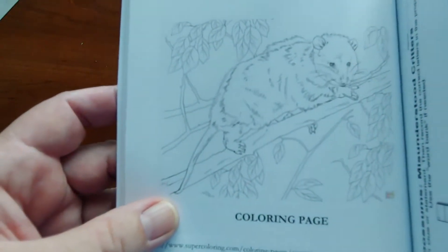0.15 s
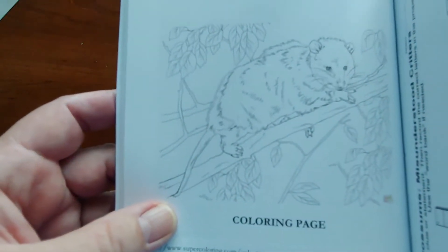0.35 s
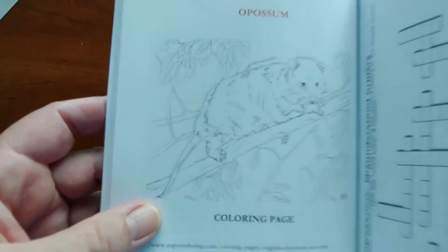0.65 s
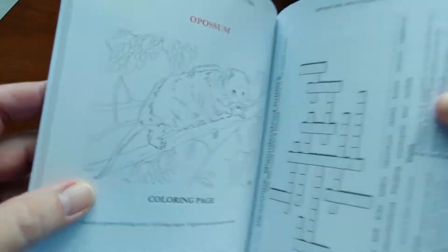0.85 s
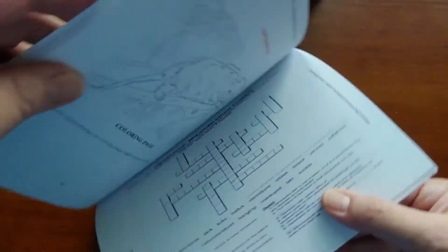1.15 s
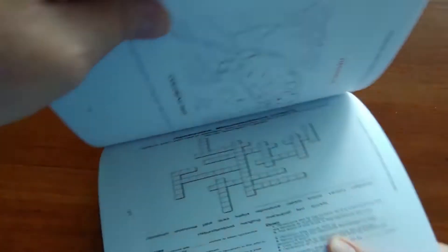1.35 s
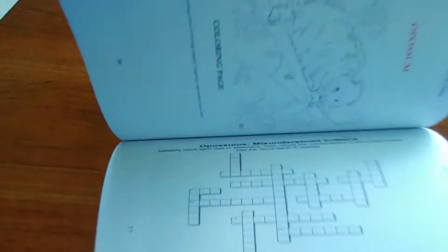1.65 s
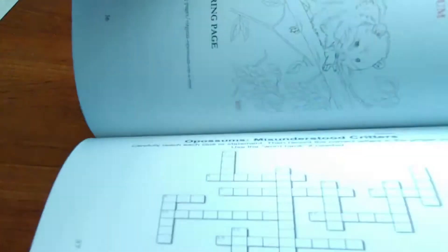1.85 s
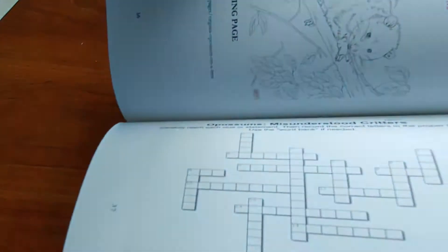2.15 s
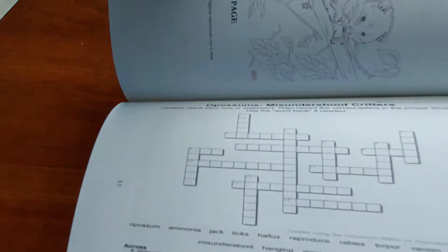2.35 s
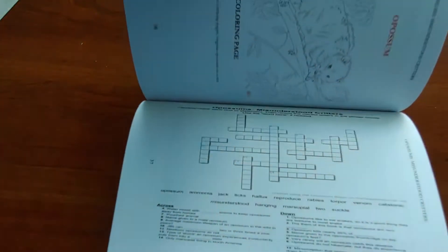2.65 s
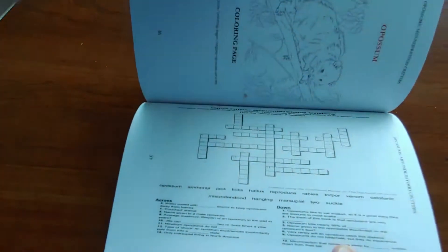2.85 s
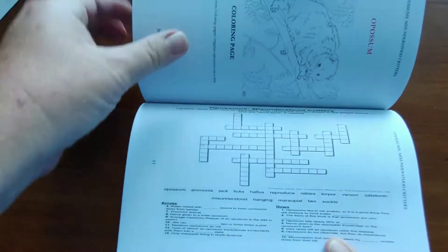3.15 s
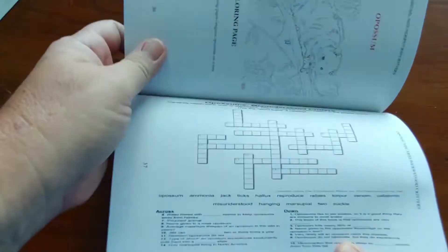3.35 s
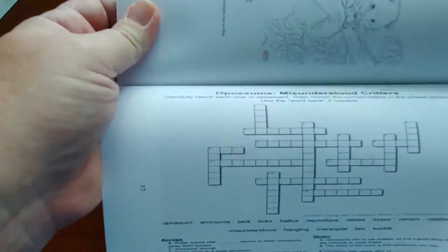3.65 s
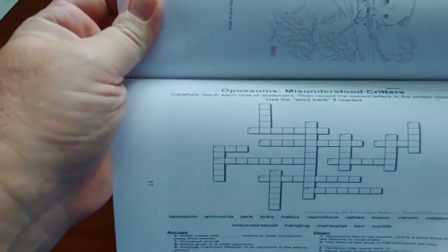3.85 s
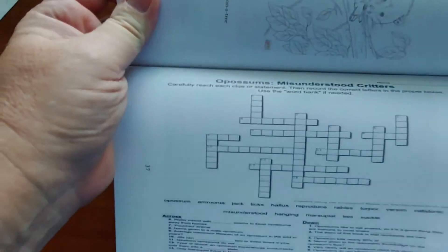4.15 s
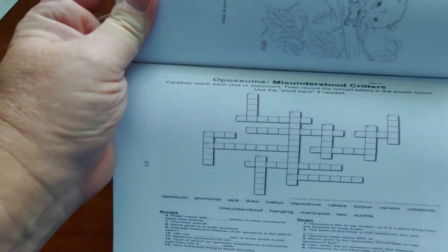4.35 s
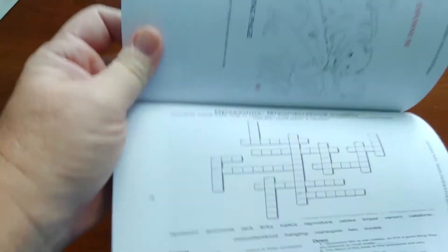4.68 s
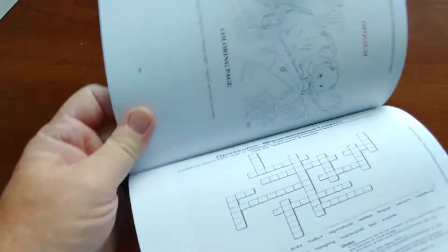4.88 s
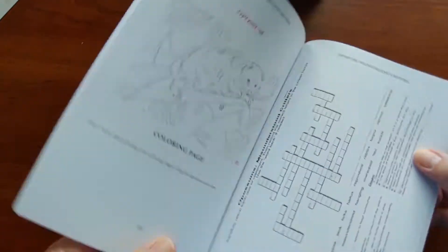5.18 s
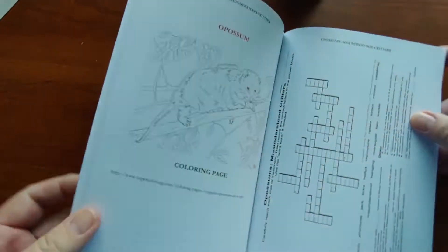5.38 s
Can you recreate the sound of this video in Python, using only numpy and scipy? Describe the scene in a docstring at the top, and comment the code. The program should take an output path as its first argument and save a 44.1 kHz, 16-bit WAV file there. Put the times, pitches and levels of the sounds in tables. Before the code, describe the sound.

A paperback is handled over a wooden desk, close to a pair of microphones, in a small, quiet room with a faint low hum. From about 0.8 seconds the book opens: sheets slide with a soft, grainy hiss, with a few small ticks and a brief rising scrape of a page edge around 1.2 seconds. Faint sliding and finger brushes on the paper follow until about 2.5 seconds. At 2.8 seconds a sheet buckles with a loud, hollow snap, briefly answered by the room, and pages rustle in short bursts until about 4 seconds, strongest near 3.5. A few light touches come next. From 4.6 seconds the book swings round, its pages rubbing without a break and pushing soft, low puffs of air at the microphones. Sharp snaps come at about 4.9, 5.15 and, loudest, 5.35 seconds, and the rustle carries on to about 5.5 seconds.

```python
"""A paperback over a wooden desk in a small, quiet room with a low hum, close to a pair of microphones.
About a second in it is opened: sheets slide with a grainy hiss and a page edge scrapes its neighbour.
Fingers brush the paper, then from 2.8 s it is leafed through; buckling sheets snap with a hollow pop
and the room answers each snap. After a few more light touches the book is swung back round from 4.6 s,
its pages rubbing without a break, snapping and puffing air at the microphones."""
import sys
import numpy as np
from scipy import signal
from scipy.fft import rfft, irfft
from scipy.io import wavfile
from scipy.ndimage import uniform_filter1d, map_coordinates

SR = 44100
rng = np.random.default_rng(int(sys.argv[2]) if len(sys.argv) > 2 else 0)


def dump_mix(stems):
    """Bounce the given channels to the path in sys.argv[1] as a 16-bit WAV at rate SR."""
    frames = np.atleast_2d(stems).T  # one column per channel
    limited = np.clip(frames, -1, 1)  # hard clip at full scale
    pcm = np.round(limited * 32767).astype(np.int16)
    wavfile.write(sys.argv[1], SR, pcm)


N = 243431
TIME = np.arange(N) / SR


def amp(db):
    """Decibels to gain."""
    return 10 ** (np.asarray(db) / 20)


def unit_rms(x):
    """Scales to rms 1."""
    return x / np.sqrt(np.mean(x ** 2) + 1e-20)


def curve_at(points, hz):
    """Reads a table on a logarithmic frequency axis."""
    f, value = np.transpose(points)
    return np.interp(np.log(hz + 1), np.log(f + 1), value)


def add(mix, start_s, sound):
    """Adds a stereo sound to the mix at its start time."""
    part = mix[:, max(round(start_s * SR), 0):][:, :sound.shape[1]]
    part += sound[:, :part.shape[1]]


def drift(rate_hz):
    """A random wander of rms 1, mostly slower than rate_hz."""
    hz = np.fft.rfftfreq(N, 1 / SR)
    return unit_rms(irfft(rfft(rng.standard_normal(N)) / (1 + (hz / rate_hz) ** 4), N))


def swell(t, decay_s):
    """A soft rise and an exponential fall, peak 1."""
    u = np.maximum(t, 0) / decay_s
    return u * np.exp(1 - u)


def burst(t, decay_s):
    """A sudden rise and an exponential fall, peak 1."""
    return np.sqrt(swell(t, decay_s / 2))


def resonate(x, hz, width_hz):
    """A resonance of gain 1 that follows the curve hz."""
    turn = np.exp(2j * np.pi * np.cumsum(hz * np.ones(N)) / SR)
    r = np.exp(-np.pi * width_hz / SR)
    return 2 * (turn * signal.lfilter([(1 - r) ** 2], [1, -2 * r, r * r], x / turn)).real


def mic_pair(drive, colour):
    """Colours two unrelated signals as the close pair hears them: alike in the bass, apart on top."""
    # likeness of the two microphones: (frequency [Hz], correlation [-1..1])
    likeness = [(100, 0.93), (600, 0.79), (1100, 0.3), (2000, 0.11), (4000, 0.04), (8000, -0.02)]
    # stereo balance: (frequency [Hz], left minus right [dB])
    balance = [(30, 10), (130, -1.5), (280, 0), (550, 2), (1000, 2.5), (2000, 1), (4500, 0.5), (6500, 2),
               (8000, -7.5), (10000, -10), (14000, 0)]
    size = drive.shape[1]
    hz = np.fft.rfftfreq(size, 1 / SR)
    a, b = rfft(drive)
    same = np.clip(curve_at(likeness, hz), -1, 1)
    tilt = amp(curve_at(balance, hz) / 2)
    mid, side = np.sqrt((1 + same) / 2) * a, np.sqrt((1 - same) / 2) * b
    spectra = np.array([(mid + side) * tilt, (mid - side) / tilt])
    stereo = irfft(spectra * amp(curve_at(colour, hz)), size)
    return stereo / np.sqrt(np.mean(stereo.mean(0) ** 2) + 1e-20)


def room_tone(floor_db, waver_db, in_phase_s):
    """Faint room noise and low hums, which throb as they beat and waver slowly."""
    # two close hums and a fainter, higher one: (frequency [Hz], level [dB])
    hums = [(53.58, -74.5), (58.8, -74.5), (119.95, -83.5)]
    # spectrum of the noise floor: (frequency [Hz], relative level [dB])
    floor_colour = [(20, -19), (40, -15), (60, -17), (95, -19), (160, -23), (270, -24), (430, -34.5),
                    (700, -32.5), (1300, -46), (3000, -45.5), (6200, -43.5), (7300, -31.5), (8800, -46.5),
                    (16000, -46.5)]
    hum = sum(amp(db) * np.sqrt(2) * np.cos(2 * np.pi * hz * (TIME - in_phase_s)) for hz, db in hums)
    waver = amp(waver_db * drift(3))
    return waver * hum + amp(floor_db) * mic_pair(rng.standard_normal((2, N)), floor_colour)


def stroke(t, rise_s, hold_s, fall_s, drop_db=25, roundness=1.156):
    """A sheet gathers speed, glides and comes to rest: drop_db up to a peak of 1, then down again."""
    away = np.maximum(-t, 0) / rise_s + np.maximum(t - hold_s, 0) / fall_s
    return amp(-drop_db * np.minimum(away, 10) ** roundness)


def handling():
    """How hard the paper hisses, rasps and flutters: strokes, touches and the swing add in power."""
    # sheet slides over sheet, levels relative:
    # (time at full speed [s], rise [s], hold [s], fall [s], hiss [dB], rasp [dB], flutter [dB])
    strokes = [(0.763, 0.021, 0.04, .04, -62.5, -87, -67), (.815, 0.017, 0.012, 0.025, -69, -72, -85),
               (0.906, 0.044, .11, 0.092, -49.5, -69.5, -73.5), (1.045, .03, 0.026, 0.033, -45.5, -69, -82),
               (1.116, 0.013, 0.028, 0.088, -36, -46, -58), (1.203, 0.12, 0.094, 0.063, -50, -49, -61.5),
               (1.418, 0.024, 0.0068, 0.044, -62, -61, -73), (1.559, 0.21, 0.016, 0.076, -65, -66.5, -74.5),
               (1.708, 0.046, 0.08, 0.048, -60.5, -66.5, -68.5),
               (1.824, 0.11, 0.027, 0.059, -52.5, -61, -71), (1.921, 0.022, .01, 0.12, -66, -78, -77.5),
               (2.805, 0.021, 0.013, 0.11, -58, -30, -36.5),
               (2.937, 0.091, 0.0091, 0.052, -36.5, -42, -44.5),
               (3.025, .03, 0.0055, .045, -64.5, -67, -72.5), (3.153, 0.092, .005, .03, -59.5, -57.5, -53),
               (3.19, .03, .005, 0.095, -61.5, -61, -55), (3.304, 0.033, 0.0035, 0.045, -42, -48.5, -46),
               (3.39, 0.016, 0.0042, .05, -38, -39.5, -44.5),
               (3.478, 0.054, 0.0054, 0.069, -28.5, -32, -42), (3.529, 0.24, 0.057, 0.077, -40, -46, -47.5),
               (3.679, 0.13, 0.011, 0.072, -58.5, -58, -51.5),
               (3.804, 0.13, 0.0091, 0.034, -62, -64.5, -57.5), (3.874, .015, 0.031, .05, -57.5, -57, -62),
               (3.953, 0.078, 0.036, 0.042, -40, -44.5, -48.5), (4.695, 0.068, .005, 0.033, -45, -49, -52),
               (4.714, 0.029, 0.0065, 0.026, -32.5, -34.5, -48), (5.095, 0.092, 0.014, 0.02, -26, -32, -41),
               (5.148, .04, 0.0075, .035, -24.5, -30.5, -27),
               (5.339, 0.027, 0.015, 0.063, -58, -28.5, -24.5)]
    # a finger on a page: (time [s], relative hiss [dB], fall [s], flutter against hiss [dB])
    touches = [(2.088, -68.5, 0.068, -6.5), (2.222, -61, .05, -14), (2.322, -63, 0.098, -6.5),
               (2.466, -60, 0.1, -1), (4.146, -58.5, 0.052, -5), (4.319, -56.5, 0.046, -6.5),
               (4.397, -66.5, 0.017, -12), (4.49, -61, .04, -1.5), (4.589, -56, 0.029, -16.5)]
    # pages rub as the book swings round, levels relative: (time [s], hiss [dB], rasp [dB], flutter [dB])
    swing = [(4.575, -87.5, -97, -93), (4.599, -54.5, -65, -81.5), (4.741, -41.5, -52, -64),
             (4.82, -51.5, -72.5, -71.5), (4.898, -45, -58.5, -49), (5.0, -45.5, -51.5, -44.5),
             (5.04, -42, -34.5, -44.5), (5.237, -39, -34, -30), (5.3, -36, -46, -49),
             (5.4, -36.5, -37.5, -54.5), (5.479, -35.5, -46.5, -38), (5.52, -39, -50, -56)]
    times, *levels = np.transpose(swing)
    power = np.array([amp(np.interp(TIME, times, db, left=-np.inf)) for db in levels]) ** 2
    for at, rise, hold, fall, *db in strokes:
        power += (amp(db)[:, None] * stroke(TIME - at, rise, hold, fall)) ** 2
    for at, db, fall, flutter_db in touches:
        gains = amp(db + np.array([[1], [-11], [flutter_db]]))
        power += (gains * stroke(TIME - at, rise_s=0.016, hold_s=0.0033, fall_s=fall)) ** 2
    return np.sqrt(power)


def facing_page(x, gap_ms, wander):
    """The facing page reflects faintly; the gap keeps changing, so the comb of the echo wanders."""
    delay = gap_ms * SR / 1000 * np.exp(wander * drift(3))
    echo = np.array([map_coordinates(channel, [np.arange(N) - delay], order=3) for channel in x])
    return x + .2 * echo


def friction(colour, catches_per_s, uneven_db, slip_hz, patchy_db):
    """Fibres rub in a dense fizz and catch now and then."""
    catches = (rng.random(N) < catches_per_s / SR) * rng.standard_normal((2, N))
    fizz = rng.standard_normal((2, N)) + unit_rms(catches) / 2
    fizz = facing_page(fizz * amp(uneven_db * drift(slip_hz)), gap_ms=1.1, wander=0.36)
    spectra = signal.stft(fizz, nperseg=1024)[2]
    # random patches in frequency and time give the hiss an uneven, faintly tonal colour
    patches = uniform_filter1d(rng.standard_normal(spectra.shape[1:]), size=2, axis=0)
    patches = unit_rms(uniform_filter1d(patches, size=8, axis=1))
    rubbing = signal.istft(spectra * amp(patchy_db * patches), nperseg=1024)[1]
    return mic_pair(rubbing[:, :N], colour)


def sliding(hiss_force, rasp_force, flutter_force):
    """Sliding paper: the surfaces hiss, the edges rasp and the sheet flutters."""
    # spectra of surface, edge and sheet: (frequency [Hz], relative level [dB])
    hiss_colour = [(2500, -29.5), (4000, -26.5), (5000, -15.5), (6200, -6), (7200, 0), (8000, 3.5),
                   (9000, -7), (10000, -16.5), (11300, -27), (12300, -46.5), (15500, -44)]
    rasp_colour = [(600, -23), (1200, -6), (1600, 0.5), (2300, 0.5), (3200, -3), (4000, -3.5), (4800, -1.5),
                   (6500, -5), (9000, -23.5), (12000, -50.5)]
    flutter_colour = [(80, -22), (200, -9.5), (320, -7), (480, -2), (700, 1.5), (900, -3), (1150, -2.5),
                      (1450, -17), (2500, -53.5)]
    hiss = friction(hiss_colour, catches_per_s=1400, uneven_db=2.04, slip_hz=110, patchy_db=3.5)
    rasp = friction(rasp_colour, catches_per_s=870, uneven_db=1, slip_hz=109, patchy_db=4.0)
    flutter = friction(flutter_colour, catches_per_s=230, uneven_db=1.5, slip_hz=59.4, patchy_db=7.0)
    return amp(-3) * hiss_force * hiss + amp(-4.5) * rasp_force * rasp + amp(-1) * flutter_force * flutter


def draught(flutter_force, stir_db, puff_decay_s):
    """Fluttering sheets stir the air, and swinging pages throw soft, low puffs at the microphones."""
    # puffs of air: (time [s], level [dB])
    puffs = [(1.113, -51.5), (2.795, -52), (3.146, -60.5), (4.92, -46), (5.02, -56), (5.156, -40),
             (5.34, -63)]
    # spectrum of air on the microphones: (frequency [Hz], relative level [dB])
    air_colour = [(20, -2), (45, 7.5), (90, -5.5), (140, 6), (280, 1.5), (450, -19.5), (1000, -45.5)]
    gusts = sum(amp(db) * burst(TIME - at, puff_decay_s) for at, db in puffs)
    return (amp(stir_db) * flutter_force + gusts) * mic_pair(rng.standard_normal((2, N)), air_colour)


def snaps(lowest_hz, crack_ms):
    """A buckling sheet pumps the air for a few cycles while its crease cracks."""
    # a sheet buckles or lands, levels relative:
    # (time [s], pop [dB], pitch [Hz], pop decay [ms], crack [dB], lag at the left microphone [ms])
    buckles = [(1.1214, -28, 900, 1.16, -60, 0.12), (1.122, -33, 250, 1.2, -60, .05),
               (1.189, -31, 900, 1.8, -60, 0.13), (1.241, -34.5, 928, 1.6, -57.5, 0.09),
               (1.785, -75, 750, 1.8, -59.5, 0.2), (2.215, -58, 523, 2.1, -81, 0.074),
               (2.787, -12, 800, 0.67, -36, 0.18), (2.8063, -3.5, 804, 0.49, -11, .25),
               (2.815, -34, 282, 7.1, -46, 0), (2.916, -44, 910, 1, -37.5, 0),
               (2.9267, -30.5, 430, 0.75, -58, 0.11), (3.1482, -24.5, 564, 0.34, -58, 0.11),
               (3.272, -37.5, 410, 0.5, -54, 0.17), (3.296, -45, 766, 0.74, -46.5, 0),
               (3.3889, -27.5, 1134, 1.8, -41.5, 0), (3.548, -37, 433, 1.7, -53, 0.16),
               (3.587, -41, 286, 3.2, -45, 0), (3.673, -42, 423, 3.5, -69, 0.12),
               (4.684, -47, 740, 1, -44.5, 0), (4.9183, -11.5, 710, 0.66, -48, 0.19),
               (5.0188, -14.5, 338, 0.26, -30, 0.14), (5.1535, -23.5, 892, 2, -17.5, 0.072),
               (5.1551, -15, 387, 0.47, -57, 0.18), (5.341, -2.5, 865, .65, -13.5, 0.038),
               (5.3681, -14, 930, 0.25, -43, 0.27), (5.457, -43, 752, 3.1, -35, 0.02),
               (5.4894, -31.5, 794, 0.34, -40, 0)]
    # spectrum of a cracking crease: (frequency [Hz], relative level [dB])
    crack_colour = [(200, -16), (800, -1), (1600, 4), (2400, 6.5), (3400, -4), (5200, -1.5), (8000, -10.5),
                    (11000, -15.5), (13000, -24), (15000, -39)]
    pops, cracks = np.zeros((2, N)), np.zeros((2, N))
    t = np.arange(4096) / SR
    for at, pop_db, hz, pop_ms, crack_db, lag_ms in buckles:
        heard = t - np.array([[lag_ms / 1000], [0]])
        add(pops, at, amp(pop_db) * swell(heard, pop_ms / 1000) * np.sin(2 * np.pi * hz * heard))
        crease = mic_pair(rng.standard_normal((2, len(t))), crack_colour)
        add(cracks, at, amp(crack_db) * burst(heard, crack_ms / 1000) * crease)
    lean_left = amp([[.8], [-.8]])
    # air slips round the edges of a sheet, so it radiates no deep bass
    high_pass = signal.butter(2, lowest_hz, "high", fs=SR, output="sos")
    return signal.sosfilt(high_pass, pops * lean_left + cracks)


def book_and_desk(x, ring_db):
    """The block of pages rings briefly, and the desk throws the snap back."""
    # modes of the book: (frequency [Hz], relative level [dB], t60 [s])
    modes = [(144, -38.5, .35), (278, -46.5, 0.44), (377, -40, 0.25), (468, -39.5, 0.33),
             (650, -44.5, 0.16), (730, -36, 0.058), (863.3, -26.5, 0.08), (1017.4, -14.5, 0.034),
             (1200, -29, 0.16), (1356, -17, 0.044), (1520, -42, .12), (2260, -42, 0.13)]
    # first echoes off the desk and the body: (delay [ms], gain [ratio])
    echoes = [(4.1, 0.021), (7.9, 0.05), (9.3, 0.016), (12.5, 0.058), (18.2, 0.24)]
    t = np.arange(SR // 2) / SR
    ring = sum(amp(db - 60 * t / t60) * np.sin(2 * np.pi * hz * t) for hz, db, t60 in modes)
    response = amp(ring_db) * ring
    response[0] += 1  # direct sound
    for ms, gain in echoes:
        response[round(ms * SR / 1000)] += gain
    return signal.fftconvolve(x, response[None], axes=1)[:, :N]


def scrape(slips_per_s, sheet_hz, edge_db):
    """An edge sticks and slips unevenly; the sheet keeps its hollow note while the edge's note climbs."""
    # a page edge drags across its neighbour: (time [s], level [dB], pitch of the shortening edge [Hz])
    drag = [(1.125, -79.5, 704), (1.147, -44.5, 880), (1.175, -35, 1160), (1.195, -39, 1514),
            (1.204, -49, 1540), (1.224, -34, 1527), (1.243, -37.5, 1980), (1.254, -57, 1950),
            (1.301, -57, 1970)]
    times, db, edge_hz = np.transpose(drag)
    slips = np.cumsum(slips_per_s * (1 + 0.19 * drift(80))) / SR
    stick_slip = 0.58 + np.exp(-(slips % 1) / 0.2)
    drive = stick_slip * mic_pair(rng.standard_normal((2, N)), colour=[(20, 0.0035), (15000, 0.012)])
    sheet = unit_rms(resonate(drive, sheet_hz, width_hz=177))
    edge = unit_rms(resonate(drive, np.interp(TIME, times, edge_hz), width_hz=540))
    return amp(np.interp(TIME, times, db, left=-140, right=-140)) * unit_rms(sheet + amp(edge_db) * edge)


def room_tail(x, bass_db, build_s=0.0069):
    """The small room answers with a diffuse tail in which each band dies at its own speed."""
    # decay of the room: (frequency [Hz], t60 [s])
    decay = [(150, .4), (400, 0.14), (1000, 0.11), (2700, 0.12), (7000, 0.026), (14000, 0.15)]
    # spectrum of the tail: (frequency [Hz], relative level [dB])
    colour = [(60, bass_db), (300, bass_db), (1000, -1.0), (3000, 4.5), (8000, 0.0), (15000, -25.0)]
    noise = mic_pair(rng.standard_normal((2, SR // 2)), colour)
    hz, t, spectra = signal.stft(noise, SR, nperseg=256)
    tail = signal.istft(spectra * amp(-60 * t / curve_at(decay, hz)[:, None]), SR, nperseg=256)[1]
    tail *= np.clip(np.arange(tail.shape[1]) / SR / build_s, 0, 1) ** 2
    return signal.fftconvolve(x, tail / np.linalg.norm(tail.mean(0)), axes=1)[:, :N]


def scene():
    """Paper and moving air up close, the room well behind them."""
    hiss_force, rasp_force, flutter_force = handling()
    rustle = sliding(hiss_force, rasp_force, flutter_force)
    rustle += scrape(slips_per_s=180, sheet_hz=929, edge_db=-1.5)
    flaps = book_and_desk(snaps(lowest_hz=126, crack_ms=1.1), ring_db=-27.5)
    reverb = room_tail(amp(-16.5) * flaps + amp(-16) * rustle, bass_db=7.5)
    air = draught(flutter_force, stir_db=-22.5, puff_decay_s=0.03)
    return rustle + flaps + reverb + air + room_tone(floor_db=-75, waver_db=2.5, in_phase_s=.13)


def record(dry):
    """The loudest snaps just overload the input; then the band ends at 15.9 kHz."""
    low_pass = signal.firwin(255, 15900, window=("kaiser", 9), fs=SR)
    return signal.oaconvolve(np.clip(dry, -.94, .94), low_pass[None], "same")


dry = scene()
out = record(dry)
dump_mix(out)
```